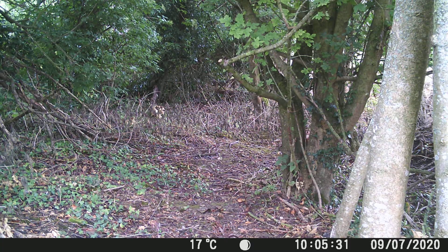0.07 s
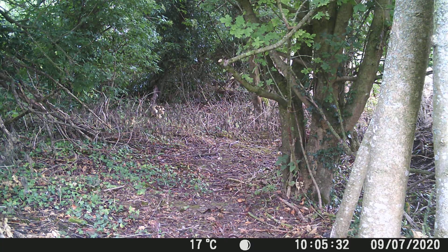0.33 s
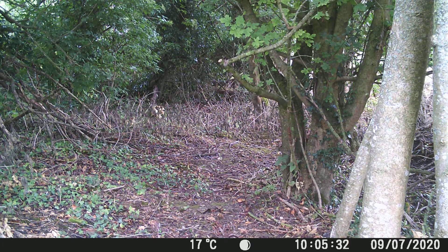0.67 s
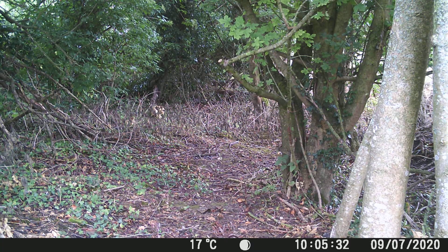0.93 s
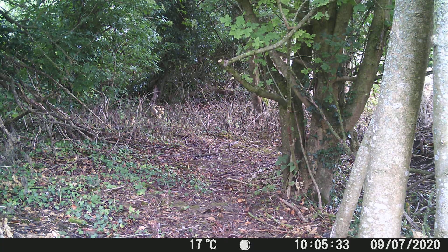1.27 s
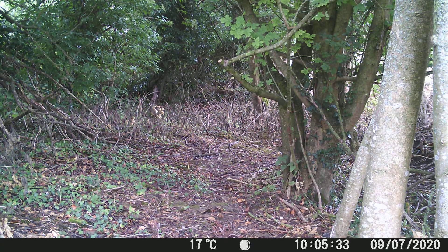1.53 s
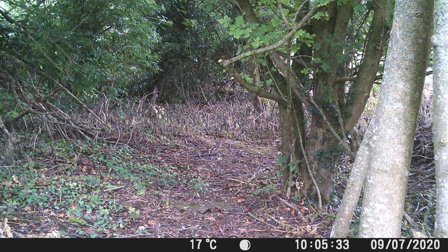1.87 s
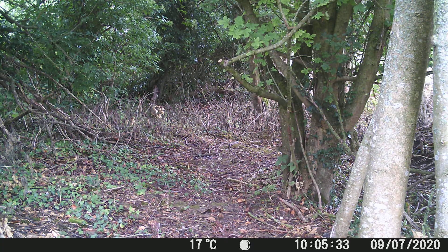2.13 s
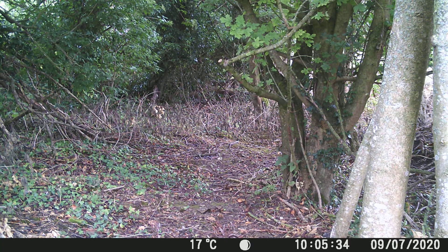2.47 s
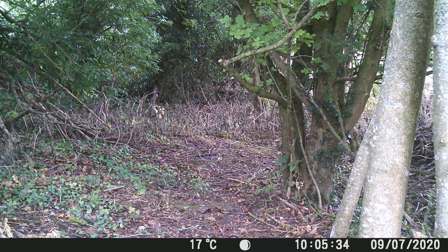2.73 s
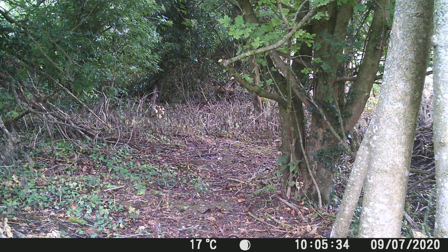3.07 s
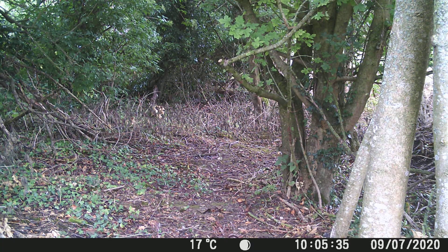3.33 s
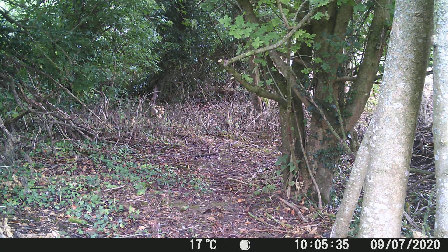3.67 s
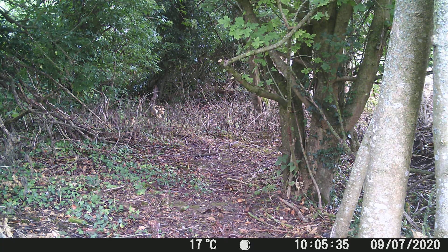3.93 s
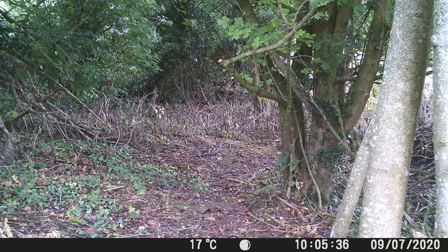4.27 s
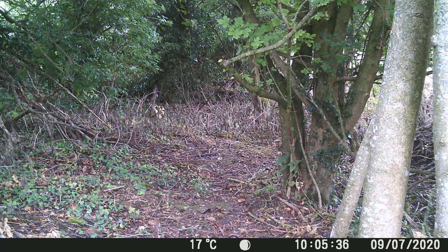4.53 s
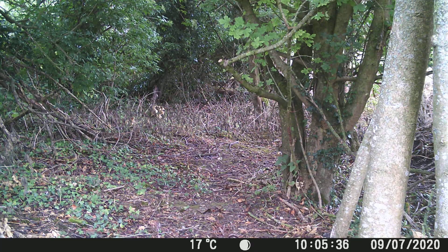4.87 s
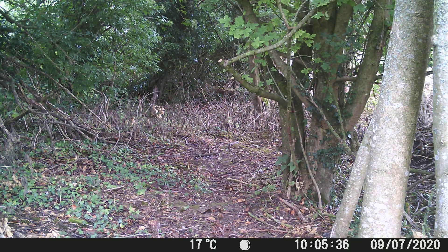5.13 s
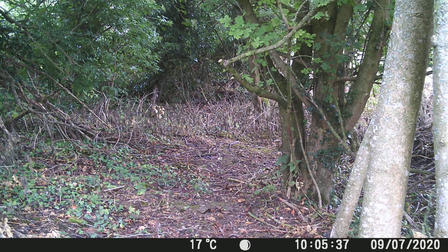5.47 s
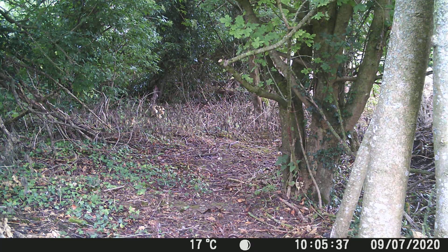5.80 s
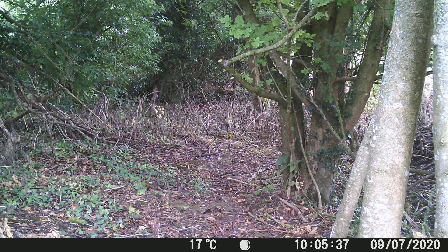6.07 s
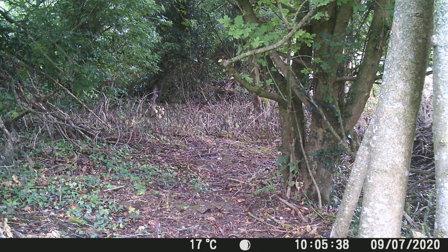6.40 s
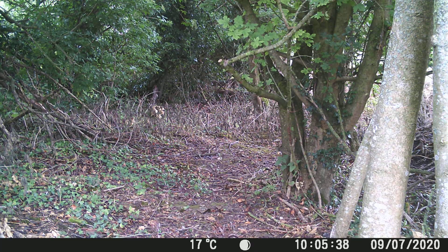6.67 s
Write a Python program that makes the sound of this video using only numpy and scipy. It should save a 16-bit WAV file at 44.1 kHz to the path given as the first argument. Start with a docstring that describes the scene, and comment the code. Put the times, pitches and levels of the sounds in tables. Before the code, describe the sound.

A still woodland clearing is heard through a trail camera's small microphone. Close up, the camera's own low rumble and faint hiss run throughout, with a soft low bump and a little fizz about five times a second. From about two seconds in, a distant songbird whistles one faint, broken phrase of short notes, and a few dull knocks sound far off. After five seconds only the air and camera noise remain.

```python
"""A still woodland clearing, heard through the small microphone of a trail camera.
Far off, a songbird whistles one short phrase and a few soft knocks sound, both scattered by the
trees, over a low wash of air. Right at the microphone is the camera's own noise: rumble and hiss,
a faint fizz with every picture frame, and five times a second a burst of fizz and a low bump
as it writes to its card."""
import sys
import numpy as np
from scipy import signal
from scipy.fft import rfft, irfft, next_fast_len
from scipy.io import wavfile
from scipy.ndimage import uniform_filter1d, map_coordinates

SR = 44100
rng = np.random.default_rng(int(sys.argv[2]) if len(sys.argv) > 2 else 0)


def dump(signal):
    """Clip the signal to [-1, 1] and save it as 16-bit WAV at the path in sys.argv[1]."""
    limited = np.clip(np.atleast_2d(signal).T, -1, 1)
    pcm = np.round(limited * 32767).astype(np.int16)
    wavfile.write(sys.argv[1], SR, pcm)


N = 296352

# The far bird's notes. Each starts scoop_hz away from its held pitch, above or below; direct is the path
# through the leaves. start_s, length_s, pitch_hz, scoop_hz, droop_hz, level_db, direct_db
BIRD_NOTES = [ (2.265, 0.038, 3150, 41, 58, -79, 0), (2.66, 0.055, 3500, 37, 118, -80.5, -10),
              (2.788, 0.06, 3900, 203, 120, -81, -10), (2.934, 0.042, 3070, 78, 120, -82, -5),
              (3.47, .077, 3950, 80, 118, -80, -4), (3.609, .054, 3100, 202, 30, -73.5, -1),
              (3.672, 0.087, 3600, -620, 140, -77.5, -10), (3.822, 0.025, 2600, -420, -80, -75, -3),
              (3.842, 0.039, 3020, -220, 50, -75, 0), (4.041, 0.071, 3220, -150, 38, -73, -0.5),
              (4.244, 0.06, 3480, 400, 160, -80, -12), (4.513, .058, 3268, -250, 274, -71.5, -1.5),
              (4.63, 0.067, 2930, 136, 100, -75, -7), (4.853, 0.054, 3340, 141, 120, -76, -5),
              (4.989, 0.04, 2900, 152, 120, -79, -4), (5.048, .04, 3190, -280, -65, -74, -3.5), ]


def songbird(waver=.011, settle_share=.33):
    """Far whistles scoop onto a pitch, hold and droop; those behind leaves arrive mostly as echo."""
    song, blocked = np.zeros(N), np.zeros(N)
    unsteady = 1 + waver * wobble(400)
    for start_s, length_s, pitch_hz, scoop_hz, droop_hz, level_db, direct_db in BIRD_NOTES:
        progress = np.linspace(0, 1, int(length_s * SR))
        span = slice(round(start_s * SR), round(start_s * SR) + len(progress))
        glide_hz = pitch_hz + scoop_hz * np.exp(-progress / settle_share) - droop_hz * progress ** 3
        phase = 2 * np.pi * np.cumsum(glide_hz * unsteady[span]) / SR
        envelope = np.sqrt(2 * np.abs(np.sin(np.pi * progress)))
        note = amp(level_db) * envelope * np.sin(phase)
        song[span] += note
        blocked[span] += (1 - amp(direct_db)) * note
    return among_trees(song, wet_db=-7) - blocked


# Soft knocks, far off in the wood: centre_s, pitch_hz, width_s, level_db
FAR_KNOCKS = [ (2.313, 342, .005, -65.5), (2.668, 237, 0.01, -65.5), (2.702, 278, 0.0058, -68.5),
              (2.9, 320, .008, -70.5), (3.278, 270.6, 0.029, -68.5), (3.47, 270, 0.012, -68.5),
              (4.848, 1035, 0.0081, -73), (4.857, 805, .009, -77), (5.173, 368.4, 0.016, -60.5),
              (5.185, 246, 0.0052, -59.5), (5.283, 440, 0.01, -73.5), (5.305, 301.4, 0.014, -73.5), ]


def knocks(waver=.02):
    """Distance rounds each knock into a dull bump with a loose pitch."""
    wavering_s = np.cumsum(1 + waver * wobble(120)) / SR
    bumps = np.zeros(N)
    for centre_s, pitch_hz, width_s, level_db in FAR_KNOCKS:
        tone = np.sqrt(2) * np.sin(2 * np.pi * pitch_hz * wavering_s)
        bumps += amp(level_db) * swell(centre_s, width_s) * tone
    return among_trees(bumps, wet_db=-5)


# How long the wood around the clearing echoes: frequency_hz, t60_s
TREE_DECAY = [(200, 0.35), (3000, 0.44), (8000, 0.27)]


def among_trees(sound, wet_db):
    """Trunks and leaves scatter a far sound into a short tail on its way to the microphone."""
    hz, t, spectra = signal.stft(rng.standard_normal(SR // 2), SR, nperseg=256)
    decay = amp(-60 * t / along(TREE_DECAY, hz)[:, None])
    tail = signal.istft(spectra * decay, SR, nperseg=256)[1]
    return sound + amp(wet_db) * signal.fftconvolve(sound, tail / np.linalg.norm(tail))[:N]


# The air of the clearing, heard through the camera's case: frequency_hz, density_db
AIR_COLOUR = [(150, -3.5), (215, 0.06), (380, -4.5), (500, -11), (580, -16.5), (640, -24.5), (760, -15),
              (900, -10), (1000, -10), (1120, -10.5), (1280, -11.5), (1700, -12), (2800, -15.5),
              (4000, -22), (6000, -43)]
# Small swells in the low air: centre_s, width_s, rise_db
AIR_SWELLS = [(1.95, .15, 3.2), (2.67, 0.11, 3.5), (5.25, 0.077, 5.5)]
# The murmur of those swells: frequency_hz, density_db
MURMUR_COLOUR = [(120, -18.5), (220, -1.5), (370, -4.5), (480, -12), (620, -41)]
# Resonances of the case around the microphone: pitch_hz, width_hz, gain_db
CASE_MODES = [(908, 55, -6.5), (1064, 80, -1.5), (1130, 74, -3.5)]


def air(wash_db=-69, ring_db=-83, murmur_db=-74):
    """The even wash of the wood, barely drifting; its low swells make the case ring more."""
    rise = amp(sum(rise_db * swell(centre_s, width_s) for centre_s, width_s, rise_db in AIR_SWELLS))
    wash = amp(wash_db + .26 * wobble(2.4)) * noise(AIR_COLOUR)
    ring = amp(ring_db + wobble(6)) * rise * ringing(CASE_MODES)
    murmur = amp(murmur_db) * (rise - 1) * noise(MURMUR_COLOUR)
    return wash + ring + murmur


# The power supply's fizz, inside the camera: frequency_hz, density_db
SUPPLY_FIZZ = [(2000, -6), (3500, -2), (6000, -3), (7500, -8), (8100, -9.5), (8500, -12.5), (8800, -25)]
# Its singing parts: pitch_hz, width_hz, gain_db
SUPPLY_WHINE = [(5020, 92, -2), (5430, 250, -3), (6940, 150, 5.5), (7590, 400, -2)]


def card_writes(period_s=.1998, half_length_s=.046, scatter_s=.0061, bump_s=.011, bump_db=-43):
    """Each write loads the supply: it fizzes and whines, and its voltage sags and springs back."""
    t = np.arange(N) / SR
    busy, sag = np.zeros(N), np.zeros(N)
    for due_s in np.arange(.1078, N / SR, period_s):
        late, longer, deeper = rng.standard_normal(3)
        centre_s = due_s + scatter_s * late
        busy += np.abs(t - centre_s) < half_length_s + scatter_s * longer
        bump = swell(centre_s + .013, 2 * bump_s) - 2 * swell(centre_s + .0086, bump_s)
        sag += amp(bump_db + 2.7 * deeper) * bump
    bursts = uniform_filter1d(busy, size=600) * amp(1.1 * wobble(45))  # soft edges, uneven level
    whine = amp(-87) * ringing(SUPPLY_WHINE)
    flutter = amp(-75) * noise([(60, -2), (250, .5), (450, -11.5), (650, -37)])
    fizz = amp(-85) * noise(SUPPLY_FIZZ)
    return sag + bursts * (fizz + whine + flutter)


def frame_ticks(frame_hz=27.76, delay_s=.0035, width_s=.0037, level_db=-84):
    """Reading out each picture leaks a tiny puff of high fizz."""
    offset_frames = ((np.arange(N) / SR - delay_s) * frame_hz + .5) % 1 - .5
    puffs = np.exp(-.5 * (offset_frames / frame_hz / width_s) ** 2)
    fizz = noise([(4500, -12), (6300, 1.5), (7500, 5.5), (8500, -12), (8800, -32)])
    return amp(level_db) * puffs * fizz


# The microphone's deep rumble, steady drone above it, and hiss: frequency_hz, density_db
RUMBLE_COLOUR = [(4, -13), (9, 7.5), (20, -2.5), (35, 0.5), (50, -6), (80, -25), (170, -61)]
DRONE_COLOUR = [(35, -12.5), (52, 1), (65, -1.5), (80, -6.5), (100, -6), (125, -14.5), (170, -25),
                (400, -59)]
HISS_COLOUR = [(2500, -18.5), (4500, -5), (5600, -4), (6200, 1), (6600, 0), (6950, 0.9), (7250, -0.5),
               (7550, 2.5), (8000, -9.5), (8450, -23.5), (8800, -18.5)]
# The slow drift of the deep rumble: time_s, level_db
RUMBLE_DRIFT = [(0, -49), (.7, -49.5), (1.4, -52.5), (2.4, -47.5), (3.2, -48.5), (4.0, -48.5), (4.8, -51.5),
                (6.7, -52.5)]


def microphone_noise(flutter_db=1.5, drone_db=-60.5, hiss_db=-82):
    """The uneven rumble and steady hiss of the small microphone and its amplifier."""
    drift_db = np.interp(np.arange(N) / SR, *np.transpose(RUMBLE_DRIFT))
    rumble = amp(drift_db + flutter_db * wobble(14)) * noise(RUMBLE_COLOUR)
    return rumble + amp(drone_db) * noise(DRONE_COLOUR) + amp(hiss_db) * noise(HISS_COLOUR)


def amp(db):
    """Decibels to gain."""
    return 10 ** (np.asarray(db) / 20)


def unit(x):
    """x at rms 1."""
    return x / np.sqrt(np.mean(x ** 2) + 1e-20)


def along(points, hz):
    """(frequency_hz, value) points read on a log frequency axis."""
    knots_hz, values = np.transpose(points)
    return np.interp(np.log(hz + 1), np.log(knots_hz + 1), values)


def wobble(rate):
    """A smooth random curve, rate knots a second."""
    return map_coordinates(rng.standard_normal(int(N * rate / SR) + 4), [np.arange(N) * rate / SR])


def swell(centre_s, width_s):
    """A bell-shaped rise and fall in time."""
    return np.exp(-.5 * np.minimum(((np.arange(N) / SR - centre_s) / width_s) ** 2, 100))


def filtered(x, response):
    """x shaped by a gain that depends on frequency."""
    size = next_fast_len(N + SR // 2)
    return irfft(rfft(x, size) * response(np.fft.rfftfreq(size, 1 / SR)), size)[:N]


def noise(colour):
    """Noise of rms 1 coloured by (frequency_hz, density_db) points."""
    return unit(filtered(rng.standard_normal(N), lambda hz: amp(along(colour, hz))))


def ringing(modes):
    """Noise of rms 1 in narrow resonances (pitch_hz, width_hz, gain_db)."""
    def response(hz):
        return sum(amp(gain_db) / (1 + (2 * (hz - pitch_hz) / width_hz) ** 2)
                   for pitch_hz, width_hz, gain_db in modes)
    return unit(filtered(rng.standard_normal(N), response))


def scene():
    """The distant wood and the camera's own close noise, in mono."""
    wood = air() + songbird() + knocks()
    return (wood + card_writes() + frame_ticks() + microphone_noise())[None]


def record(dry):
    """The camera keeps nothing above its band limit."""
    top_hz = 8650
    return filtered(dry[0], lambda hz: 1 / np.sqrt(1 + (hz / top_hz) ** 160))[None]


dry = scene()
out = record(dry)
dump(out)
```